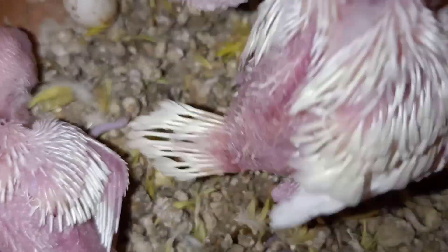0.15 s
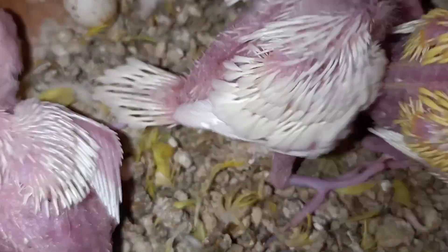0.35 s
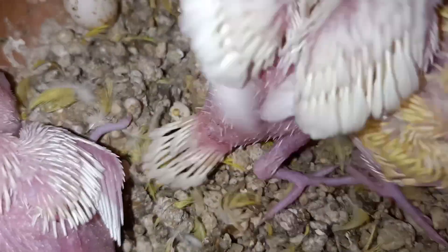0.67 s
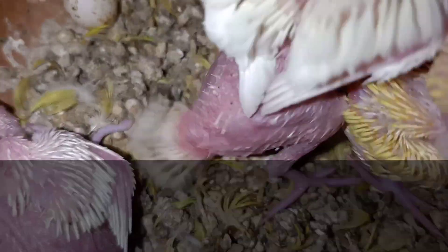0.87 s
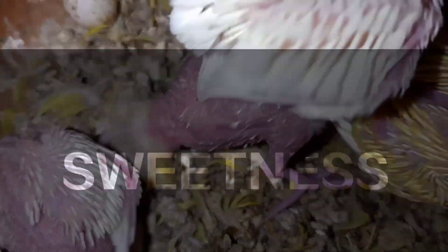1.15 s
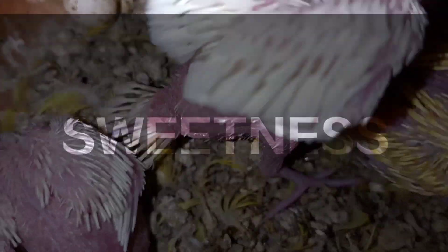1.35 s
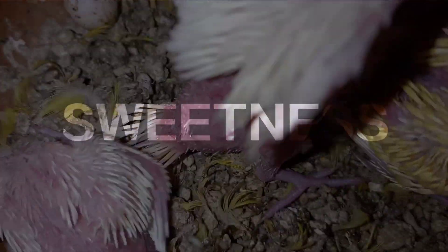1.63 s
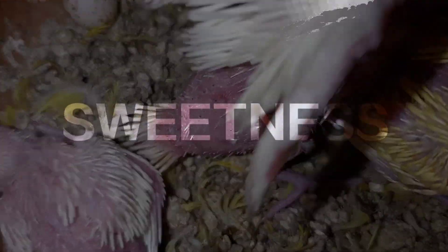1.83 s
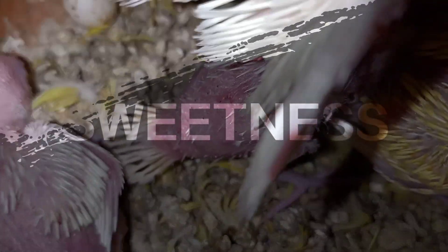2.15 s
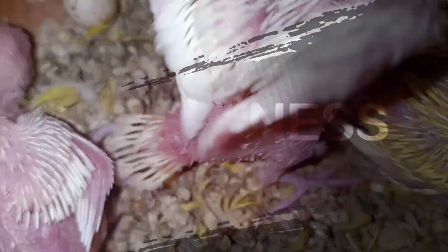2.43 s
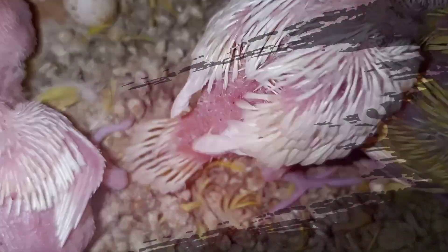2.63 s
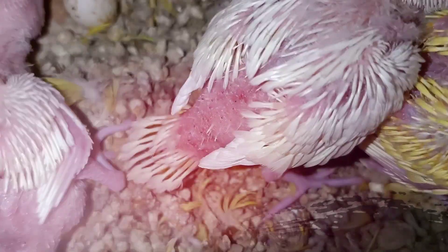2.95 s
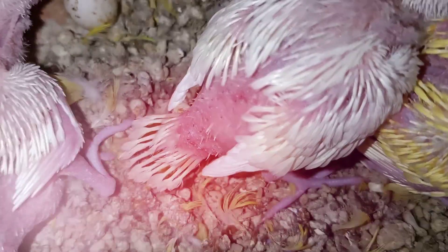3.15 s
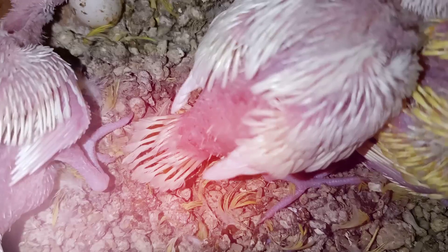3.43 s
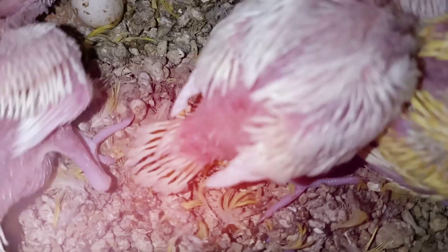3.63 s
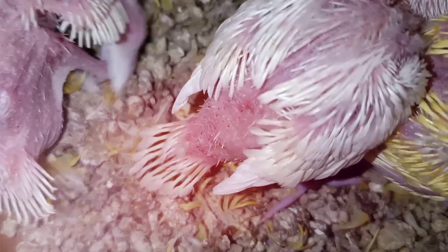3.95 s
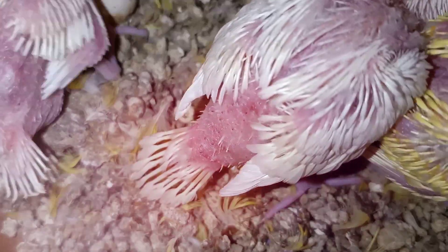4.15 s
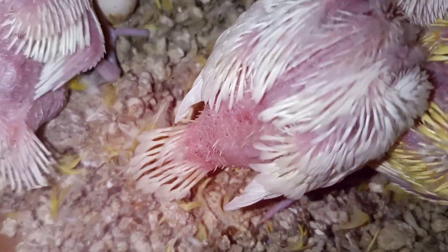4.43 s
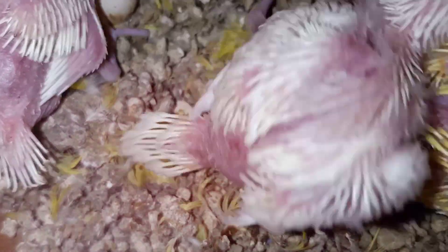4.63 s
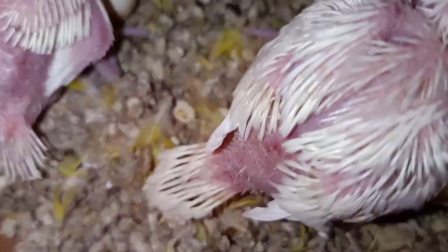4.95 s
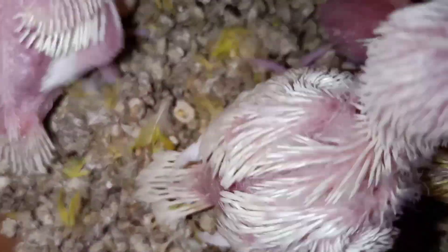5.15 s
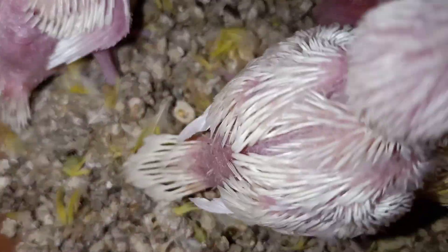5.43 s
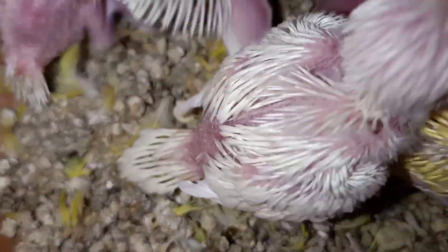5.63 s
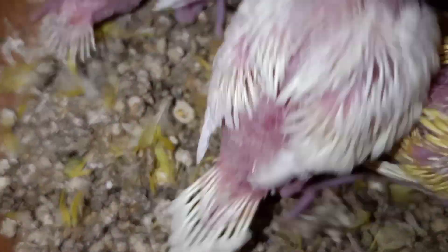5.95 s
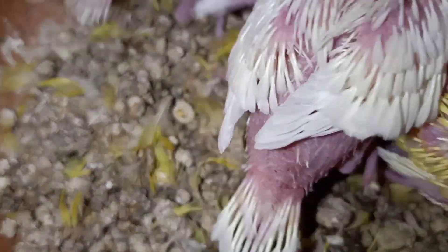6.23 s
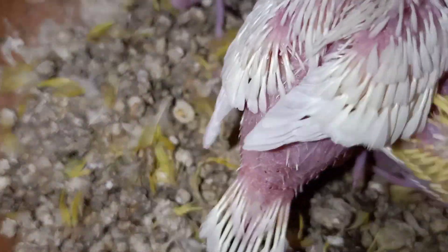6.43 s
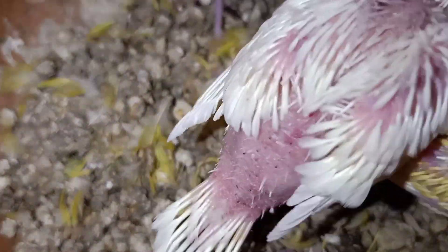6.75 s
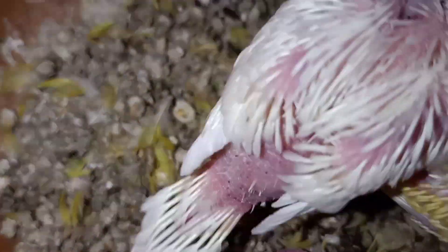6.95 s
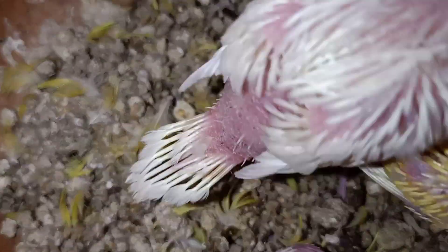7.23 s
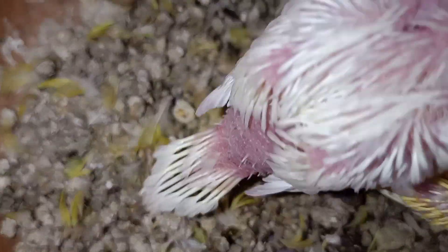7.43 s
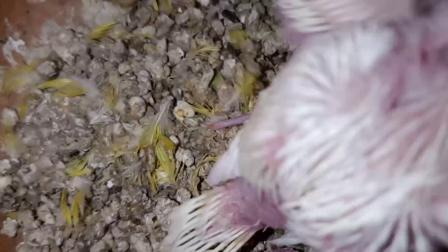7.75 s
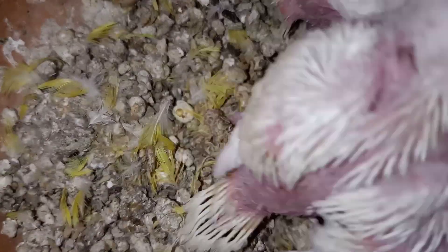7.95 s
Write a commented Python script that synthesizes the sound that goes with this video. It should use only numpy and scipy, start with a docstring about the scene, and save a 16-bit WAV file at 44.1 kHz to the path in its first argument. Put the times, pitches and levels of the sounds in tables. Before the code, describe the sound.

Several young parrots chatter throughout in a wooden nest box, close to the microphone and a little left of centre. Their high, rough voices overlap in quick bouts, several a second, mixed with short whistled chirps and thin, toneless begging hisses. At about 0.5 seconds a loud squawk starts shrill and falls into a harsh rasp. From 2 to 3.6 seconds bodies shuffle softly in the litter, with a small snap near 3 seconds and a sharper one with a brief rustle at 4.3. The hisses stand out more from about 4 seconds. A second falling squawk comes at 5.3 seconds, together with the sharpest snaps. The chirping and rasping carry on, a third squawk cuts through at about 7.7 seconds, and the chatter lasts to the end at 8. The room echoes slightly, with a quiet steady rush of air and a very faint hum behind.

```python
"""Raspy, overlapping chatter: young parrots beg in a wooden nest box, close to the microphone, left of centre.
Each voice is a whistle roughened by the unevenly beating membranes of the syrinx. Single chirps,
toneless hisses, a few sharp snaps and three falling squawks stand out; bodies shuffle in the litter.
The box smears each call and the room answers faintly. Farther off are its steady rush and faint hum."""
import sys
import numpy as np
from scipy import signal
from scipy.fft import rfft, irfft, next_fast_len
from scipy.io import wavfile
from scipy.ndimage import uniform_filter1d

SR = 44100
rng = np.random.default_rng(int(sys.argv[2]) if len(sys.argv) > 2 else 0)


def dump_mix(stems):
    """Bounce the given channels to the path in sys.argv[1] as a 16-bit WAV at rate SR."""
    frames = np.atleast_2d(stems).T  # one column per channel
    limited = np.clip(frames, -1, 1)  # hard clip at full scale
    pcm = np.round(limited * 32767).astype(np.int16)
    wavfile.write(sys.argv[1], SR, pcm)


N = 356328
TIME = np.arange(N) / SR

# bouts of rasping, several chicks at once: (start [s], end [s], pitch [Hz], level [dB])
RASP_BOUTS = [(0.0, 0.245, 2500, -32.5), (0.31, 0.503, 2950, -29.5), (0.54, 0.65, 2895, -26),
              (0.712, 0.922, 2980, -31.5), (1.131, 1.22, 3010, -39.5), (1.429, 1.636, 2842, -33),
              (1.692, 1.826, 2800, -31), (2.02, 2.147, 2700, -30.5), (2.18, 2.4, 2827, -29.5),
              (2.429, 2.64, 2744, -32), (2.672, 2.833, 3157, -34), (2.86, 3.03, 2350, -32.5),
              (3.08, 3.3, 3153, -38.5), (3.368, 3.551, 2896, -28.5), (3.581, 3.937, 2800, -35.5),
              (4.23, 4.334, 3074, -32.5), (4.54, 4.86, 3000, -28.5), (5.03, 5.172, 2772, -30),
              (5.35, 5.472, 3020, -26.5), (5.528, 5.612, 2986, -32), (5.729, 5.84, 2560, -35),
              (6.001, 6.174, 3035, -32), (6.269, 6.534, 3080, -31), (6.549, 6.855, 2720, -29.5),
              (6.88, 7.026, 2902, -28), (7.059, 7.206, 2845, -35.5), (7.359, 7.55, 3050, -29),
              (7.571, 7.79, 3087, -27.5), (8.022, 8.08, 3006, -33.5)]
# voices in the chatter: (pitch [multiple of the bout's], level [dB], roughness [0-1], left-right [dB])
CHICK_VOICES = [(.78, -6.5, .7, -0.5), (.93, -5, .5, 6), (1.06, -4.5, .55, 3), (1.28, -9.5, .55, 1.5)]
# single chirps:
# (start [s], end [s], first pitch [Hz], last pitch [Hz], level [dB], roughness [0-1], left-right [dB])
CHIRP_CALLS = [(0.062, 0.204, 3090, 3120, -30, .55, 5), (0.071, 0.171, 2090, 2142, -32.5, .55, 4),
               (0.179, 0.208, 2540, 2510, -25.5, .4, 2), (0.346, 0.475, 3190, 3010, -23, .25, 1.5),
               (0.371, 0.411, 2064, 2096, -31.5, .65, 2), (0.819, 0.936, 3120, 3100, -35, .9, 4),
               (1.274, 1.382, 2150, 2170, -31.5, .25, 4), (1.411, 1.491, 1990, 1840, -36.5, 0.4, 2),
               (1.581, 1.658, 2176, 2220, -29, .3, 4), (1.697, 1.82, 3650, 3160, -36.5, .7, 5.5),
               (1.877, 1.939, 2180, 2150, -28, .27, 5), (2.01, 2.058, 3550, 3420, -34, 0.2, 7),
               (2.171, 2.218, 2480, 2420, -31, 0.2, 0), (2.256, 2.361, 3150, 3416, -31, 0.6, 4),
               (2.427, 2.53, 2700, 2660, -28, .4, 2), (2.442, 2.489, 1980, 1925, -30.5, .5, 3.5),
               (2.559, 2.703, 3013, 3340, -32.5, .35, 6), (2.683, 2.78, 3870, 3890, -33.5, .8, 1),
               (2.761, 2.879, 3020, 3050, -31.5, .25, 5), (2.83, 2.915, 2078, 2084, -27.5, .2, 0.5),
               (2.89, 3.054, 2530, 2493, -28.5, .27, 9), (3.07, 3.19, 2760, 3515, -34.5, .5, 4),
               (3.199, 3.349, 3580, 3720, -31.5, .35, 4), (3.348, 3.431, 3076, 3090, -29.5, .45, 3),
               (3.429, 3.506, 3086, 3104, -25.5, .75, 5.5), (3.53, 3.877, 2950, 2814, -34, .27, 5),
               (3.798, 3.871, 4250, 4140, -37, 0.5, 10), (4.008, 4.08, 2656, 2500, -29.5, .75, 3),
               (4.259, 4.352, 3400, 3630, -36.5, 0.5, 2.5), (4.619, 4.738, 3257, 3213, -27.5, .95, 1.5),
               (4.68, 4.725, 2300, 2230, -29.5, .25, 9), (4.8, 4.91, 4400, 4400, -27, .7, 3.5),
               (4.831, 4.966, 2584, 2443, -32.5, .42, 1.5), (5.08, 5.216, 2798, 2810, -32.5, 0.43, 3),
               (5.42, 5.52, 2970, 2820, -33, 0.7, 2.5), (5.645, 5.724, 1890, 1990, -27, .22, 4),
               (5.689, 5.783, 2198, 2300, -30, .8, 5), (5.78, 5.857, 2055, 1956, -36, .35, -1.5),
               (6.33, 6.404, 3130, 3150, -33, .28, -4), (6.399, 6.533, 3750, 3640, -36.5, 0.5, 0),
               (7.328, 7.393, 3900, 3820, -35, .6, 4), (6.57, 6.65, 2470, 2476, -27.5, 0.3, -4),
               (6.587, 6.639, 3090, 2840, -26.5, .4, 4), (6.692, 6.781, 2345, 2810, -25, .5, 0.5),
               (6.921, 7.033, 3160, 3134, -24.5, .42, 1), (7.413, 7.532, 3464, 3600, -26, 0.7, 0),
               (7.56, 7.637, 2904, 3080, -32, 0.1, -3.5), (7.775, 7.808, 2113, 2040, -29, 0.2, 1.5),
               (7.82, 7.931, 2004, 1920, -40, .2, 3), (8.023, 8.08, 3016, 2987, -31, 0.5, 8)]
# loud falling squawks: (start [s], length [s], first pitch [Hz], shrill level [dB], rasp level [dB])
SQUAWK_CALLS = [(0.473, 0.156, 4940, -15.5, -16), (5.261, 0.15, 4520, -15, -20.5),
                (7.64, 0.158, 4700, -15, -22)]
# the throat favours the middle of the voices' range: (frequency [Hz], gain [dB])
THROAT_RESPONSE = [(300, -34), (1100, 3.5), (1500, -2.5), (1950, 0), (3000, 1), (3500, -1.5), (4400, -1.5),
                   (5000, -6), (5650, -7.5), (6300, -9), (7300, -8), (8200, -22), (10000, -35.5)]
# toneless calls: (start [s], end [s], treble level [dB], hoarse lower part against the treble [dB])
HISS_CALLS = [(0.041, 0.202, -39, -5), (0.298, 0.34, -37, 3), (0.517, 0.595, -31.5, 7.5),
              (0.731, 0.92, -38.5, -1.5), (1.032, 1.192, -34, -11), (1.582, 1.647, -38, -8),
              (1.883, 2.01, -42, 1), (2.069, 2.143, -37, 4), (2.236, 2.336, -40, 7),
              (2.415, 2.496, -34.5, -2), (2.679, 2.9, -41, 6), (3.43, 3.498, -43.5, 11.5),
              (3.886, 3.95, -30.5, -8), (4.02, 4.076, -36.5, -21), (4.204, 4.26, -32, -4),
              (4.468, 4.535, -37, -2), (4.612, 4.697, -28, -4), (4.789, 4.91, -30, -5),
              (5.017, 5.054, -40.5, 6.5), (5.159, 5.26, -29.5, -4), (5.679, 5.737, -39.5, 9.5),
              (5.975, 6.055, -37, -1), (6.254, 6.315, -25.5, -3), (6.589, 6.69, -35, -1.5),
              (6.897, 6.965, -32, -11), (7.161, 7.213, -40, 2.5), (7.258, 7.308, -35, 1.5),
              (7.425, 7.463, -29.5, -15), (7.659, 7.776, -37, -5), (7.913, 7.95, -41.5, 6),
              (8.031, 8.09, -35.5, 2)]
# colour of a hiss: (frequency [Hz], relative level [dB])
HISS_SPECTRUM = [(1000, -23), (1800, 2.5), (2700, 1.5), (3600, 7.5), (4400, 1), (5300, -1.5), (6300, 0.5),
                 (7100, -11.5), (7900, -25.5), (9000, -25), (9900, -48)]
# sharp snaps in the box: (time [s], level [dB], pitch [Hz])
SNAPS = [(2.974, -23, 2495), (4.278, -14, 3150), (5.2715, -13, 5000), (5.3236, -5, 2300),
         (5.3247, -4.5, 3370)]
# chicks shuffling in the litter: (start [s], end [s], level [dB])
LITTER_MOVES = [(2.051, 2.496, -46), (2.81, 2.944, -36), (2.943, 3.206, -37.5), (3.219, 3.6, -44.5),
                (4.273, 4.335, -38.5)]
# colour of the shuffling: (frequency [Hz], relative level [dB])
LITTER_SPECTRUM = [(200, -29.5), (450, -4), (750, -0.5), (1020, 4), (1250, 0.5), (1700, -0.5), (2500, 3),
                   (6000, -48.5)]
# rush of air in the room: (time [s], level [dB])
AIR_LEVEL = [(0, -39.5), (1.5, -40.5), (3.5, -39), (4.1, -41), (4.7, -37), (6.15, -41.5), (6.4, -37.5),
             (8.08, -36)]
# colour of the rush: (frequency [Hz], relative level [dB])
AIR_SPECTRUM = [(25, -18.5), (70, -23.5), (120, -15), (160, -8.5), (220, -8.5), (300, -3), (450, -1.5),
                (800, 1), (1300, -1), (1900, -1), (3000, -1.5), (5000, -14.5), (6500, -17.5), (8000, -43.5)]
# mains hum: (frequency [Hz], level [dB])
HUM_TONES = [(100, -74), (250, -63), (350, -71), (442, -61.5), (800, -62.5)]


def chatter(slide=.035, waver_db=2.0):
    """Several chicks rasp at once, close to the microphone, each swelling and sliding on its own."""
    out = np.zeros((2, N))
    for span, gain, pitch_hz in bouts():
        for ratio, voice_db, rough, left_db in CHICK_VOICES:
            sliding_hz = pitch_hz * ratio * np.exp(slide * drift(12, len(gain)))
            voice = syrinx(sliding_hz, rough, overtone_db=-16.0)
            waver = from_db(voice_db + waver_db * drift(16, len(gain)))
            place_in_box(out, voice * gain * waver, span.start, left_db)
    return out


def bouts(fade_s=.075, murmur_hz=2884, murmur_db=-44, swing_db=1.5):
    """Span, gain and pitch of the soft murmur that never stops and of each bout of rasping over it."""
    calls = [(slice(0, N), from_db(murmur_db + swing_db * drift(5, N)), murmur_hz)]
    for start, end, pitch_hz, level_db in RASP_BOUTS:
        span, shape = swell(start, end, fade_s)
        calls.append((span, np.sqrt(shape) * from_db(level_db), pitch_hz))
    return calls


def syrinx(pitch_hz, rough, overtone_db, wobble=.03, jitter=.15, rasp_db=5.0, throb_db=3.0, rasp_rate=750):
    """A chick's whistle: the membranes jump in pitch and beat unevenly, more so in a rough call."""
    size = len(pitch_hz)
    bend = wobble * np.sqrt(rough) * drift(200, size) + jitter * rough * drift(1500, size)
    phase = 2 * np.pi * np.cumsum(pitch_hz * np.exp(bend)) / SR
    # quick slaps make the rasp, slower ones a stutter
    slaps_db = rasp_db * np.sqrt(rough) * np.tanh(drift(rasp_rate, size))
    stutter_db = throb_db * np.tanh(drift(130, size))
    beats = from_db(slaps_db + stutter_db)
    beats /= np.sqrt(uniform_filter1d(beats ** 2, size=1500))
    # the overtones are hoarser than the note itself
    hoarse_phase = phase + .4 * drift(600, size)
    overtones = from_db(overtone_db) * (np.sin(2 * hoarse_phase) + from_db(-10) * np.sin(3 * hoarse_phase))
    return beats * (np.sin(phase) + overtones) * np.sqrt(2)


def chirps(fade_s=.026, arch_db=.5, wander=.01803, beak_hz=4380, loss_db_per_octave=120.5):
    """Short, unsteady gliding notes; overtones are strongest when the second meets the beak's pitch."""
    out = np.zeros((2, N))
    for start, end, first_hz, last_hz, level_db, rough, left_db in CHIRP_CALLS:
        span, shape = swell(start, end, fade_s)
        glide_hz = np.interp(TIME[span], [start, end], [first_hz, last_hz])
        octaves_off_beak = np.abs(np.log2(2 * glide_hz / beak_hz))
        overtone_db = np.maximum(-4.5 - loss_db_per_octave * octaves_off_beak, -24)
        note = syrinx(glide_hz * np.exp(wander * drift(30, len(shape))), rough, overtone_db)
        push_db = -arch_db * np.linspace(-1, 1, len(shape)) ** 2   # strongest in mid-call
        place_in_box(out, from_db(level_db + push_db) * shape * note, span.start, left_db)
    return out


def squawks(attack_s=.013, release_s=.022):
    """Both sides of the syrinx cry out: a shrill voice gives way to a low, harsh rasp."""
    out = np.zeros((2, N))
    for start, length, first_hz, shrill_db, rasp_db in SQUAWK_CALLS:
        span = slice(*np.searchsorted(TIME, [start, start + length + release_s]))
        t = TIME[span] - start
        cry = shrill_voice(t, first_hz, shrill_db) + low_rasp(t, length, rasp_db)
        shape = np.interp(t, [0, attack_s, length - release_s, length + release_s], [0, 1, 1, 0])
        place_in_box(out, shape * cry, span.start, left_db=3.5, direct_db=-4.5, box_db=-5.5)
    return out


def shrill_voice(t, first_hz, level_db, rest_hz=3500, sink_s=.08, hold_s=.047, decay_db_per_s=185):
    """The top of a squawk sinks towards a resting pitch; its level holds, then dies."""
    pitch_hz = rest_hz + (first_hz - rest_hz) * np.exp(-t / sink_s)
    voice = syrinx(pitch_hz, rough=.6, overtone_db=-23.0, wobble=.035, jitter=.11,
                   rasp_db=3.0, throb_db=2.5, rasp_rate=800)
    return voice * from_db(level_db - decay_db_per_s * np.maximum(t - hold_s, 0))


def low_rasp(t, length, level_db, pitch_hz=2880, full_s=.093, swell_db_per_s=309, pulse_depth=.5):
    """The bottom of a squawk swells and breaks into ever slower pulses."""
    voice = syrinx(np.full(len(t), pitch_hz), rough=.7, overtone_db=-20.5, wobble=.0502, jitter=.14,
                   rasp_db=4.0, throb_db=2.0, rasp_rate=630)
    pulses_per_s = np.interp(t, [0, length], [520, 240])
    pulses = 1 + pulse_depth * np.cos(2 * np.pi * np.cumsum(pulses_per_s) / SR)
    return voice * pulses * from_db(level_db - swell_db_per_s * np.maximum(full_s - t, 0))


def hisses(fade_s=.032):
    """Toneless begging calls: a thin hiss at the beak over a hoarser sound from the throat."""
    out = np.zeros((2, N))
    for start, end, level_db, low_db in HISS_CALLS:
        span, shape = swell(start, end, fade_s)
        tilt = [(4000, level_db + low_db), (5600, level_db)]
        hiss = coloured(grainy(len(shape), HISS_SPECTRUM), tilt)
        place_in_box(out, shape * hiss, span.start, left_db=6.5)
    return out


def hoarseness(level_db=-17.5):
    """A little hiss rides on all the chatter."""
    out = np.zeros((2, N))
    for span, gain, _ in bouts():
        hiss = from_db(level_db) * gain * grainy(len(gain), HISS_SPECTRUM)
        place_in_box(out, hiss, span.start, left_db=7.5, direct_db=-2.5, box_db=-6.5)
    return out


def snaps(width_s=.00055):
    """Sharp snaps at close range, each only a few cycles long."""
    out = np.zeros((2, N))
    for time_s, level_db, hz in SNAPS:
        span = slice(*np.searchsorted(TIME, [time_s - .004, time_s + .004]))
        t = TIME[span] - time_s
        snap = from_db(level_db) * np.exp(-(t / width_s) ** 2) * np.sin(2 * np.pi * hz * t)
        place_in_box(out, snap, span.start, left_db=5.0)
    return out


def shuffles(fade_s=.03):
    """Bodies and feet push softly through the litter in the box."""
    out = np.zeros((2, N))
    for start, end, level_db in LITTER_MOVES:
        span, shape = swell(start, end, fade_s)
        rustle = grainy(len(shape), LITTER_SPECTRUM, grain_db=0.0)
        place_in_box(out, from_db(level_db) * shape * rustle, span.start, left_db=3.5)
    return out


def place_in_box(out, call, start, left_db, direct_db=-4.0, box_db=-3.5):
    """Add a call to `out`: each spot in the box has its own reflections, which smear it."""
    response = from_db(box_db) * echoes(t60_s=.025, size=2048)
    response[:, 0] = from_db(direct_db)   # the straight path to the microphone
    heard = signal.oaconvolve(call[None], response, axes=1)[:, :N - start]
    heard *= np.sqrt(2 * np.sum(call ** 2) / (np.sum(heard ** 2) + 1e-20))   # keep the call's power
    out[:, start:start + heard.shape[1]] += heard * pan(left_db)


def echoes(t60_s, size):
    """Dense reflections that die away, different at each side of the microphone; unit power."""
    t = np.arange(size) / SR
    response = rng.standard_normal((2, size)) * from_db(-60 * t / t60_s) * (t > .0005)
    return response / np.sqrt(np.sum(response ** 2, axis=1, keepdims=True))


def room_rush(side_db=-6.0):
    """Behind the box, a little to the left: steady moving air and a faint mains hum."""
    level_db = np.interp(TIME, *np.transpose(AIR_LEVEL))
    mid, side = unit_power(coloured(rng.standard_normal((2, N)), AIR_SPECTRUM))
    rush = from_db(level_db) * (mid + from_db(side_db) * side * np.array([[1], [-1]]))
    hum = sum(from_db(db) * np.sqrt(2) * np.sin(2 * np.pi * hz * TIME) for hz, db in HUM_TONES)
    return (rush + hum) * pan(left_db=1.6)


def swell(start, end, fade_s):
    """Where a call lies in time, and its soft rise and fall."""
    span = slice(*np.searchsorted(TIME, [start - fade_s, end + fade_s]))
    inside_s = np.minimum(TIME[span] - start, end - TIME[span])
    ramp = np.clip((inside_s + fade_s) / (2 * fade_s), 0, 1)
    return span, np.sin(np.pi / 2 * ramp) ** 2


def grainy(size, spectrum, grain_db=1.0):
    """Coloured noise that flutters within milliseconds; unit power."""
    noise = rng.standard_normal(size) * from_db(grain_db * drift(500, size))
    return unit_power(coloured(noise, spectrum))


def drift(rate, size):
    """Smooth chance of spread 1 that changes about `rate` times a second."""
    knots = rng.standard_normal(size // 16 + 8)
    return np.interp(np.arange(size) * (rate / SR), np.arange(len(knots)), knots) / np.sqrt(2 / 3)


def coloured(x, spectrum):
    """Filter by a table of (frequency [Hz], gain [dB])."""
    hz, db = np.transpose(spectrum)
    size = next_fast_len(x.shape[-1] + 1024)
    bins_hz = np.maximum(np.arange(size // 2 + 1) * SR / size, 1)
    gain = from_db(np.interp(np.log(bins_hz), np.log(hz), db))
    return irfft(rfft(x, size) * gain, size)[..., :x.shape[-1]]


def pan(left_db):
    """Left and right gains, `left_db` apart."""
    return from_db(left_db / 2 * np.array([[1], [-1]]))


def from_db(db):
    """Decibels to gain."""
    return 10 ** (np.asarray(db) / 20)


def unit_power(x):
    """Scale to a mean square of 1."""
    return x / np.sqrt(np.mean(x ** 2) + 1e-20)


def scene(room_db=-9.5):
    """The box stands close by, left of centre; the room answers faintly."""
    voices = coloured(chatter() + chirps() + squawks(), THROAT_RESPONSE)
    nest = voices + hoarseness() + hisses() + snaps() + shuffles()
    room = signal.oaconvolve(nest, echoes(t60_s=.46, size=16000), axes=1)[:, :N]
    return nest + from_db(room_db) * room + room_rush()


def record(dry, cutoff_hz=9800):
    """After the microphone, only the very loudest peaks are rounded; the top is cut steeply."""
    rounded = dry / (1 + dry ** 8) ** (1 / 8)
    return signal.sosfilt(signal.ellip(10, .1, 80, cutoff_hz, fs=SR, output="sos"), rounded)


dry = scene()
out = record(dry)
dump_mix(out)
```